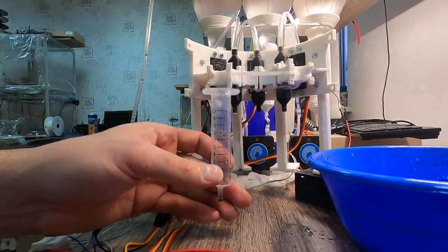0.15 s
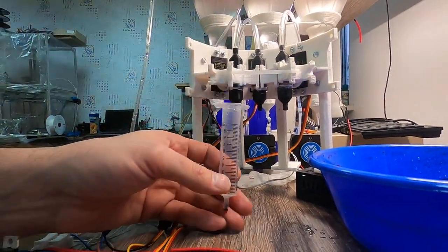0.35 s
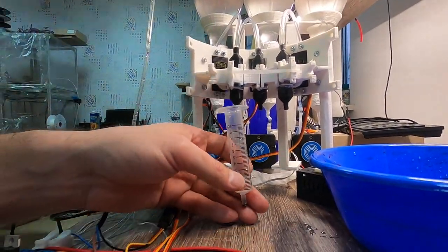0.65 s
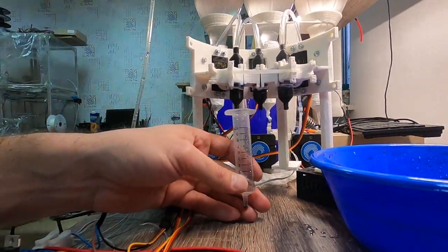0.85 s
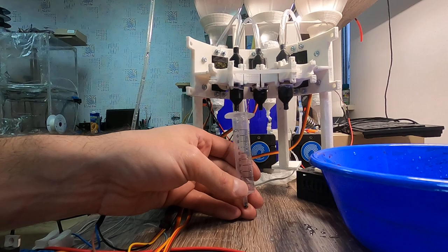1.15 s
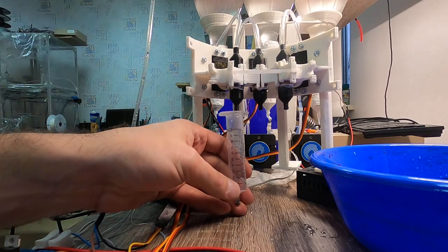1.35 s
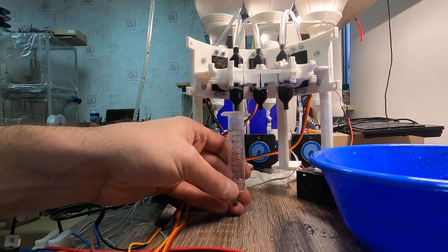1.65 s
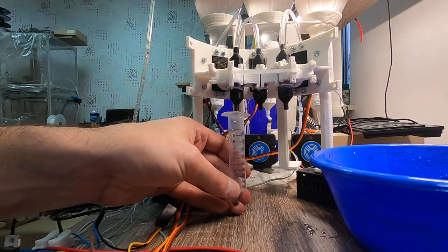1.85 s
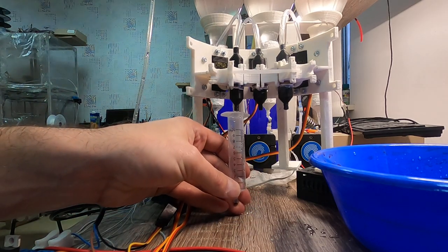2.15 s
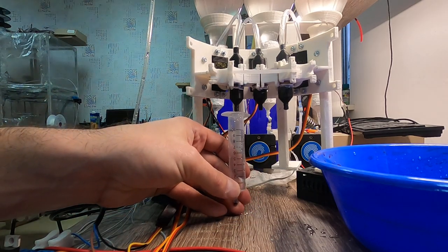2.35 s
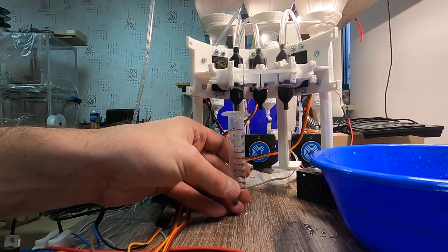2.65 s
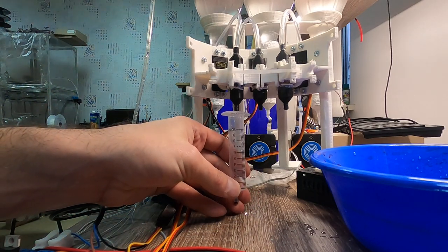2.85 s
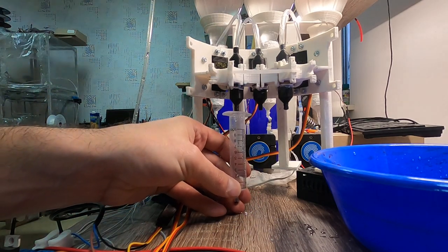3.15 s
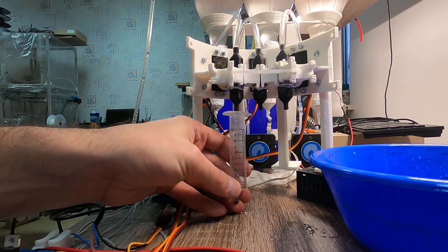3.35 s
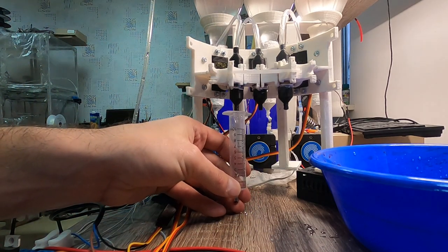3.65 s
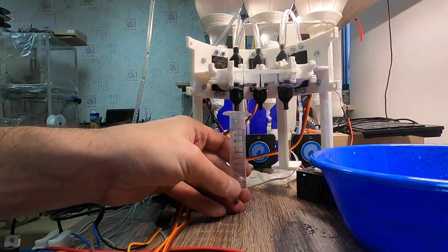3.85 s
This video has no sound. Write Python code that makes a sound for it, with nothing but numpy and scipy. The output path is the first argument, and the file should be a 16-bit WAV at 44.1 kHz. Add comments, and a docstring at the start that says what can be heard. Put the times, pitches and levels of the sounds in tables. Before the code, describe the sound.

Quiet indoor hum comes first, with barely audible taps of plastic in a hand. A button snaps down and up, and a small pump motor growls, climbs quickly in pitch and holds a wavering whirr, miked nearby.

```python
"""A stepper-driven roller pump jolts, ramps up and runs steadily in a quiet room after a button is pressed.
Its motor steps and unevenly loaded rollers excite decaying frame modes; sines and narrow noise make its whine.
The button, plastic taps and tubing ticks are short noise bursts that ring a few resonances.
Shaped noise and faint steady tones form the room hum; airy treble lingers after the press."""
import sys
import numpy as np
from scipy import signal
from scipy.fft import rfft, irfft, next_fast_len
from scipy.io import wavfile
from scipy.ndimage import uniform_filter1d

SR = 44100
rng = np.random.default_rng(int(sys.argv[2]) if len(sys.argv) > 2 else 0)


def volts(x):
    """Linear amplitude factor 10**(x/20) for a level x in dB, scalar or array-like."""
    e = np.asarray(x, float) / 20
    return 10 ** e


def wav_out(sig):
    """Save sig, one row per channel (or a flat mono array), as 16-bit PCM at SR to the path in sys.argv[1]."""
    wavfile.write(sys.argv[1], SR, np.round(np.clip(np.atleast_2d(sig).T, -1, 1) * 32767).astype(np.int16))


N = 176400

# Effort of the motor steps, strong at low speed and weaker as the rotor spins up.
# Each row: time in seconds, kick in dB, sharp edge in dB relative to the kick.
KICK_EFFORT = [(2.2, -26, 0), (2.23, -22, -13), (2.245, -19, -8), (2.26, -19, -3), (2.28, -25, -8),
               (2.3, -24, -6.5), (2.315, -22.5, -6), (2.33, -23.5, -14), (2.35, -23, -3.5),
               (2.365, -27.5, -6.5), (2.371, -30, -1), (2.393, -31, -6), (2.402, -24.5, -3),
               (2.433, -30.5, -8.5), (2.44, -36, -2), (2.47, -33.5, -2.5), (2.485, -31, -3.5),
               (2.505, -37, -3.5), (2.513, -33, -5.5), (2.545, -35.5, -0.5), (2.565, -33.5, -7.5),
               (2.585, -30.5, -9), (2.62, -63, -6.5), (4, -61, -6.5)]
# Pull of the four unequal coils. Each entry: change of the kick in dB.
COIL_PULL = [-0.5, -1, 0.5, -1.5]
# The coils take hold of the rotor, then pull it loose.
# Each row: start in seconds, push in dB, sharp edge in dB.
ROTOR_JOLTS = [(2.1205, -16, -32.5), (2.209, -30.5, -29.5)]
# Modes of the plastic frame. Each row: frequency in Hz, T60 in seconds, response to steps in dB,
# response to roller load in dB.
FRAME_MODES = [(36, 0.25, -36.5, -13), (64.9, 0.82, -32.5, -11.5), (155.1, 0.21, -3, -5),
               (180.2, 0.75, -12.5, -6.5), (206.2, 0.77, -11, -13), (264.15, 0.37, 1, -9.5),
               (438, 0.064, -4.5, -42), (554.5, 0.049, 1, -15.5), (649, 0.076, -7, -17),
               (1037, 0.04, -17, -18), (598, 0.09, -9, -25.5), (1200, 0.096, -14.5, -7.5),
               (1265, 0.092, -7, -16), (1304, 0.037, -4, -14.5), (1720, 0.041, -16, -40.5),
               (1980, 0.043, -26, -38.5), (2600, 0.0077, -22.5, -35.5), (2720, 0.058, -23, -43.5),
               (3427, 0.0078, -13.5, -19), (3460, 0.075, -25, -46), (3660, 0.046, -25, -40.5),
               (5270, 0.0033, -11.5, -31.5), (6400, 0.014, -30.5, -37)]
# Low shudder of the frame, surging at low speed and then dying abruptly.
# Each row: time in seconds, gain of the lowest modes in dB, gain of the main mode in dB.
SHUDDER_GAIN = [(2.12, -6, -6.5), (2.15, -3.5, -4), (2.185, 1.5, 3), (2.2, -6.5, -10.5), (2.22, 0, -3),
                (2.24, -1, 0.5), (2.26, -0.5, -5), (2.28, -6.5, -4), (2.292, -3, 2.5), (2.308, -5, 2.5),
                (2.32, -7.5, -2), (2.345, -9.5, 2), (2.362, -3.5, 1.5), (2.372, -17.5, -20),
                (2.42, -8.5, -6.5), (2.5, 0.5, 1)]
# Load on the rollers. Each row: time in seconds, whine in dB (used about its mean),
# rumble in dB (before a common trim), gain of the pump head in dB.
ROLLER_LOAD = [(2.6, -38, -37.5, 1), (2.724, -36.5, -38, -3), (2.822, -41.5, -37.5, -2),
               (2.946, -35, -36.5, -0.5), (3.024, -42.5, -35.5, -1.5), (3.086, -37, -38, 0.5),
               (3.181, -40, -36.5, -0.5), (3.262, -36, -36, 0), (3.29, -41, -35.5, 1.5),
               (3.405, -31.5, -34.5, 3), (3.534, -39, -36.5, -8.5), (3.594, -35.5, -33, 4.5),
               (3.656, -35, -39, -4), (3.694, -40, -32.5, 2), (3.766, -31.5, -38, -1.5),
               (3.878, -38, -34, -4), (3.94, -34.5, -34.5, 6), (4.0, -34.5, -43.5, -4.5)]
# Whine of the coils. Each row: multiple of the coil cycle, mean level in dB rms at full speed.
COIL_WHINE = [(1, -43.5), (2, -66), (4, -34.5), (7, -76), (8, -65), (10, -66), (12, -59.5), (14, -73.5),
              (17, -78.5)]
# Lines above the step tone, made by the throbbing rollers.
# Each row: offset in roller passes, mean level in dB rms before the load gain.
ROLLER_SIDEBANDS = [(1, -46.5), (2, -55), (3, -49.5), (4, -49), (5, -56.5)]
# Narrow modes of the pump head. Each row: frequency in Hz, T60 in seconds, dB rms before the load gain.
HEAD_MODES = [(1172, .2, -52), (1201, .25, -45), (1238, .15, -55), (1300, .15, -52), (1314, .2, -46),
              (1330, .2, -53)]
# Press, bounce and release of the button. Each row: start in seconds, drive of the snap in dB,
# drive of the body in dB, drive of the rattle in dB.
BUTTON_CLICKS = [(2.0299, -23, -26, -39), (2.0431, -46.5, -51, -57), (2.163, -37, -25.5, -39)]
# Modes of the button case. Each row: frequency in Hz, response in dB, T60 in seconds.
CASE_MODES = [(315, 4.5, 0.033), (572, 0, 0.041), (782, -1, 0.038), (1897, -9.5, 0.032),
              (2520, -10.5, 0.036), (4250, -22, 0.016), (5140, -30.5, 0.073), (7000, -24, 0.0114),
              (8700, -3, 0.012), (9500, -15, 0.02), (15200, -11, 0.008)]
# Ticks of tubing and plastic. Each row: start in seconds, drive in dB (before a common trim), pitch in Hz,
# upper ring in dB, top ring in dB (before a common lift), both relative to the drive.
PLASTIC_TICKS = [(1.7094, -66, 3060, -16, -18), (2.095, -44.5, 3340, -14, -6),
                 (2.5459, -38, 3300, -32.5, -36), (2.6627, -33, 3350, -37.5, -36),
                 (2.6873, -40.5, 3440, -34, -40), (2.7202, -36.5, 3370, -28, -35),
                 (2.891, -43, 3460, -28.5, -37), (3.0113, -30.5, 3550, -11.5, -18.5),
                 (3.0704, -32, 3480, -20, -33), (3.0878, -37.5, 3430, -22, -40),
                 (3.1213, -41.5, 3460, -10.5, -24), (3.2613, -36, 3400, -15.5, -30.5),
                 (3.4136, -39.5, 3160, -21, -27.5), (3.4348, -35, 3180, -16.5, -41),
                 (3.532, -44.5, 3460, -5.5, -38), (3.584, -37.5, 3490, -14, -29),
                 (3.675, -44, 3450, -5.5, -24), (3.7059, -27.5, 3460, -16, -55),
                 (3.7658, -32, 3350, -31, -47), (3.9346, -42.5, 3440, -2, -35),
                 (3.9395, -26, 3470, -20, -49), (3.9914, -39, 3570, -14, -24)]
# Light taps of plastic in the hand. Each row: start in seconds, snap drive in dB,
# body drive in dB (before a common trim).
HAND_TAPS = [(0.2983, -28.5, -61), (0.3712, -40.5, -62)]
# Airy treble around the start. Each row: time in seconds, level in dB rms.
AIR_LEVEL = [(2.04, -68), (2.2, -67.5), (2.3, -70), (2.5, -75.5), (2.6, -84.5)]
# Faint steady tones of the room. Each row: frequency in Hz, mean level in dB rms.
ROOM_TONES = [(673, -61), (840, -65), (1300, -68.5)]
# Spectrum of the room hum. Each row: frequency in Hz, relative density in dB per Hz.
ROOM_SPECTRUM = [(12, -28), (20, -4.5), (69, -3.5), (91, -4), (124, -3.5), (146, -7), (188, 2), (211, -3.5),
                 (229, -14.5), (264, -3), (303, -7.5), (390, -2.5), (425, -7), (562, -7.5), (647, -11.5),
                 (723, -16), (856, -20), (1100, -17.5), (1300, -16), (2100, -29.5), (3110, -25),
                 (6090, -40), (8530, -42.5), (14900, -53), (16200, -59.5)]
# Difference of the room at the two ports. Each row: frequency in Hz, side minus mid in dB.
ROOM_WIDTH = [(60, -35.5), (110, -69), (200, -72.5), (380, -44.5), (700, -36.5), (1290, -32.5),
              (2380, -32.5), (4400, -29), (8120, -17.5), (15000, 4.5)]
# Slow level of the room hum. Each row: time in seconds, gain in dB.
ROOM_GAIN = [(0, 2.1), (.3, 0.51), (.5, 0.027), (2, 0.3), (4, 0.12)]
# Level difference of the pump at the two ports. Each row: frequency in Hz, left minus right in dB.
PORT_BALANCE = [(30, 3), (60, 2), (110, 1), (200, .1), (700, .3), (1000, -2), (1152, -3), (1350, -2.5),
                (2380, 1.5), (4400, 2), (8120, 1.5)]
# Phase difference of the pump at the two ports. Each row: frequency in Hz, lead of the left in radians.
PORT_PHASE = [(25, 0.65), (60, -0.87), (150, -0.063), (600, -0.34), (1000, -0.24), (1152, -1),
              (1460, -0.25), (7000, -0.94), (9000, -.1)]

# the step rate ramps evenly from rest to full speed
START_S, RAMP_HZ_PER_S, FULL_HZ = 2.208, 3030, 1152.3
FULL_S = START_S + FULL_HZ / RAMP_HZ_PER_S
STEPS_PER_TURN, ROLLERS, COILS = 200, 6, 4
WHINE_RISE_S = .04
EDGE_S = .0001  # length of the sharp edge of a kick or jolt
LOWEST_HZ, SHUDDER_HZ = 230, 300  # upper limits of the lowest modes and of the shudder


def along(table, x, axis=1):
    """Linear interpolation reads a column of a table at x."""
    a = np.array(table, float)
    return np.interp(x, a[:, 0], a[:, axis])


def by_hz(table):
    """Interpolation on a logarithmic frequency axis reads a (Hz, value) table at every FFT bin."""
    a = np.array(table, float)
    return np.interp(np.log(np.fft.rfftfreq(N, 1 / SR) + 1), np.log(a[:, 0]), a[:, 1])


def butter(x, order, hz, kind):
    """A Butterworth filter has a maximally flat passband."""
    return signal.sosfilt(signal.butter(order, hz, kind, fs=SR, output="sos"), x)


def ring(x, hz, t60):
    """A two-pole resonator is one decaying mode; a unit impulse rings with peak near 1."""
    r = np.exp(-np.log(1000) / (max(t60, .001) * SR))
    w = 2 * np.pi * hz / SR
    return signal.lfilter([0, r * np.sin(w)], [1, -2 * r * np.cos(w), r * r], x)


def push(x, seconds):
    """A one-pole lowpass rounds impulses into pushes with the given time constant."""
    soft = np.exp(-1 / (seconds * SR))
    return signal.lfilter([1 - soft], [1, -soft], x)


def unit(x):
    """Division by the rms scales a signal to rms 1."""
    return x / np.sqrt(np.mean(x ** 2))


def walk(rate):
    """Random values, held and smoothed twice, give a slow fluctuation of rms 1."""
    k = int(SR / rate)
    held = np.repeat(rng.standard_normal(size=999), k)[:N]
    return unit(uniform_filter1d(uniform_filter1d(held, k), k))


def clicks(times, sizes):
    """Impulses shared between neighbouring samples fall at fractional times."""
    out, at = np.zeros(N + 2), np.clip(np.asarray(times) * SR, 0, N)
    i = at.astype(int)
    np.add.at(out, i, sizes * (1 - at + i))
    np.add.at(out, i + 1, sizes * (at - i))
    return out[:N]


def burst(t, s, decay):
    """Noise under a square-root rise and exponential decay models a brief impact."""
    age = np.clip(t - s, 0, None) / decay
    return rng.standard_normal(N) * np.sqrt(age) * np.exp(-age) * 2


def room(t):
    """Spectrally shaped noise is the room hum; a weak side signal makes the two ports differ."""
    level_db, wander_db = -46, .5
    shape = volts(by_hz(ROOM_SPECTRUM))
    mid = irfft(rfft(rng.standard_normal(N)) * shape, N)
    side = irfft(rfft(rng.standard_normal(N)) * shape * volts(by_hz(ROOM_WIDTH)), N)
    gain = volts(level_db + along(ROOM_GAIN, t) + wander_db * walk(rate=1.5)) / np.sqrt(np.mean(mid ** 2))
    return gain * np.array([mid + side, mid - side])


def room_tones(t):
    """Sines of constant frequency and slowly wavering level form the faint tones of the room."""
    out = 0
    for hz, db in ROOM_TONES:
        out = out + np.sqrt(2) * volts(db + 2 * walk(20)) * np.sin(2 * np.pi * (hz * t + rng.random()))
    return out


def air(t):
    """Independent highpassed noise at each port gives a diffuse treble that lingers after the press."""
    hiss = butter(rng.standard_normal((2, N)), 2, 11500, "high")
    return unit(hiss) * volts(along(AIR_LEVEL, t)) * (t > AIR_LEVEL[0][0]) * (t < AIR_LEVEL[-1][0])


def taps(t):
    """A brief impact radiates a crisp broadband snap and excites a short hollow resonance."""
    out = 0
    for s, db, body_db in HAND_TAPS:
        snap = burst(t, s, .0009)
        out = out + volts(db) * butter(push(snap, .0001), 3, [1400, 8500], "band")
        out = out + volts(body_db - 15) * ring(snap, 1880, 0.014)
    return out


def ticks(t):
    """Short impacts ring three resonances; random weak impulses add a faint crackle once the pump runs."""
    out = 0
    for s, db, hz, mid_db, top_db in PLASTIC_TICKS:
        hit = volts(db - 16) * burst(t, s, .0014)
        out = out + ring(hit, hz, 0.0037)
        out = out + volts(mid_db) * ring(hit, 5780, 0.0096)
        out = out + volts(top_db + 4) * ring(hit, 8800, 0.0089)
        out = out + volts(mid_db - 5) * butter(hit, 2, [1500, 6500], "band")
    crackle_per_s, crackle_db, spread_db = 280, -69.5, 4
    sizes = volts(crackle_db + spread_db * np.minimum(rng.exponential(size=N), 3))
    fine = (rng.random(N) < crackle_per_s / SR) * sizes * (t > 2.55)
    out = out + ring(fine, 2700, 0.011) + ring(fine, 5400, 0.0023)
    return butter(out, 3, 8200, "low")


def button(t):
    """Contact makes a bright snap and a short rattle, and an impulse excites the modes of the case."""
    out = 0
    for s, db, body_db, rattle_db in BUTTON_CLICKS:
        snap = burst(t, s, 0.0011)
        out = out + volts(db) * butter(snap, 1, [3500, 10000], "band")
        out = out + volts(db - 12) * ring(snap, 7540, 0.0024)
        rattle = burst(t, s + 0.00076, 0.0076)
        out = out + volts(rattle_db) * butter(rattle, 2, [1500, 6000], "band")
        hit = clicks([s + 0.000997], volts(body_db))
        for k, (hz, gain_db, t60) in enumerate(CASE_MODES):
            out = out + (-1) ** k * volts(gain_db) * ring(hit, hz, t60)
    return out


def unsteadiness(t):
    """The rotor's irregularity grows linearly from none to full in the upper part of the ramp."""
    return np.clip((t - 2.31) / .1, 0, 1)


def motor_steps(t):
    """The integral of the step rate is the step count; the rotor hunts about its speed on the ramp."""
    wobble_share = .012
    rate = np.clip((t - START_S) * RAMP_HZ_PER_S, 0, FULL_HZ)
    hunt = unsteadiness(t) * (rate < FULL_HZ)
    return np.cumsum(rate * (1 + wobble_share * hunt * walk(rate=50))) / SR


def step_kicks(t, steps):
    """Each whole step applies an impulse, a rounded push plus a sharp edge, of uneven force."""
    scatter_share, jitter_s, stutter_db = .07, .00003, 3.5
    count = np.arange(int(steps[-1]))
    at = np.interp(count, steps[t >= START_S], t[t >= START_S])
    stutter = stutter_db * unsteadiness(at) * np.interp(at, t, walk(rate=60))
    force = volts(along(KICK_EFFORT, at) + np.array(COIL_PULL)[count % COILS] + stutter)
    force = force * (1 + scatter_share * rng.standard_normal(len(at)))
    at = at + jitter_s * rng.standard_normal(len(at))
    edge = force * volts(along(KICK_EFFORT, at, axis=2))
    return push(clicks(at, force), .0013) + push(clicks(at, edge), EDGE_S)


def rotor_jolts():
    """A sudden magnetic pull on the rotor is an impulse with a rounded push and a sharp edge."""
    when, push_db, edge_db = np.array(ROTOR_JOLTS).T
    return push(clicks(when, volts(push_db)), .0011) + push(clicks(when, volts(edge_db)), EDGE_S)


def roller_shake(t, turn):
    """Uneven rollers load the shaft with noise that partly repeats at each turn and each roller pass."""
    turn_share, roller_share, throb_db, trim_db, rise_s = 0.74, 0.35, 2.5, -4.5, .065

    def again(phase, size):
        """Periodicity: one stretch of noise is read anew in every cycle."""
        return rng.standard_normal(size)[(phase % 1 * size).astype(int)]

    shake = rng.standard_normal(N) + turn_share * again(turn, size=7650)
    shake = shake + roller_share * again(turn * ROLLERS, size=1275)
    throb = throb_db * np.cos(2 * np.pi * turn * ROLLERS)
    level = volts(throb + along(ROLLER_LOAD, t, axis=2) + trim_db)
    return shake * level * np.clip(1 + (t - FULL_S) / rise_s, 0, 1)


def loose_parts(kicks, shudder):
    """Beyond a small gap, the shudder displacement makes loose parts chatter: a one-sided nonlinearity."""
    gap, gain_db = 0.018, -20
    sway = ring(kicks, 262.6, 0.29) * shudder
    noise = butter(rng.standard_normal(N), 2, 1800, "low")
    chatter = noise * 3 * volts(gain_db) * np.clip(sway - gap, 0, None)
    return chatter - push(chatter, 0.0008)  # without the low part


def frame(t, steps):
    """Modal superposition: step kicks and roller load excite the decaying modes of the plastic frame."""
    kick_ring_share = 0.47  # hard kicks die faster in the upper modes than the light rumble
    kicks = step_kicks(t, steps) + rotor_jolts()
    lowest, shudder = volts(along(SHUDDER_GAIN, t)), volts(along(SHUDDER_GAIN, t, axis=2))
    shake = roller_shake(t, steps / STEPS_PER_TURN) + loose_parts(kicks, shudder)
    out = 0
    for k, (hz, t60, step_db, load_db) in enumerate(FRAME_MODES):
        kick_t60 = t60 if hz < SHUDDER_HZ else kick_ring_share * t60
        gain = lowest if hz < LOWEST_HZ else shudder if hz < SHUDDER_HZ else 1
        struck = volts(step_db) * ring(kicks, hz, kick_t60) * gain
        # a long mode gathers more noise power, hence the division
        shaken = volts(load_db) * ring(shake, hz, t60) / np.sqrt(t60 * SR / 23.8)
        out = out + (-1) ** k * (struck + shaken)
    return out


def coil_whine(t, steps):
    """Magnetic force periodic in the coil cycle radiates its harmonics; load sways the step tone."""
    swing = along(ROLLER_LOAD, t) - np.mean(np.array(ROLLER_LOAD)[:, 1])
    out = 0
    for k, db in COIL_WHINE:
        step_tone = k == COILS
        level_db = db + (1.2 if step_tone else 1.5) * walk(24.7) + swing * step_tone
        # the step tone rises just before full speed, the others just after
        rise = np.clip(step_tone + (t - FULL_S) / WHINE_RISE_S, 0, 1)
        tone = np.sin(2 * np.pi * (k * steps / COILS + rng.random()))
        out = out + np.sqrt(2) * volts(level_db) * tone * rise
    return out


def pump_head(t, steps):
    """Modulation by the rollers puts sidebands above the step tone; noise excites narrow head modes."""
    sideband_waver_db, throb_db = 3, 1.5
    passes = steps / STEPS_PER_TURN * ROLLERS
    out = 0
    for k, db in ROLLER_SIDEBANDS:
        tone = np.sin(2 * np.pi * (steps + k * passes + rng.random()))
        out = out + np.sqrt(2) * volts(db + sideband_waver_db * walk(rate=7.8)) * tone
    for hz, t60, db in HEAD_MODES:
        out = out + volts(db) * unit(ring(ring(rng.standard_normal(N), hz, t60), hz, t60))
    out = out * volts(along(ROLLER_LOAD, t, axis=3) + throb_db * np.cos(2 * np.pi * passes))
    return out * np.clip(1 + (t - FULL_S) / WHINE_RISE_S, 0, 1)


def pump(t):
    """One rotor motion drives both the frame and the tones of coils and head, so they stay in step."""
    steps = motor_steps(t)
    return frame(t, steps), coil_whine(t, steps) + pump_head(t, steps)


def two_ports(bench):
    """Level and phase differences, split evenly between the ports, place the bench to one side."""
    half = volts(by_hz(PORT_BALANCE) / 2) * np.exp(.5j * by_hz(PORT_PHASE))
    return np.array([irfft(rfft(bench) * half, N), irfft(rfft(bench) / half, N)])


def echo(t, source):
    """Convolution with exponentially decaying noise gives a short dull reverberation."""
    t60_s, wide, gain_db = 0.34, .3, -10
    mid, side = rng.standard_normal((2, N)) * (t > .004) * np.exp(-np.log(1000) * t / t60_s)
    side = wide * (side - push(side, .0002))  # only the treble differs between the ports
    tail = np.array([mid + side, mid - side]) / np.sqrt(np.sum(mid ** 2))
    tail = butter(tail, 1, [450, 4000], "band")
    size = next_fast_len(2 * N)
    return volts(gain_db) * irfft(rfft(source, size) * rfft(tail, size), size)[:, :N]


def scene():
    """Superposition: bench sounds at one side, the button near the middle, their echo, and the room."""
    t = np.arange(N) / SR
    press_lag_s, press_echo_db = .000012, -4
    vibration, tones = pump(t)
    press = button(t)
    knocks = vibration + ticks(t) + taps(t)
    near = two_ports(knocks + tones)
    near = near + np.array([press, np.interp(t - press_lag_s, t, press)])
    reflected = echo(t, knocks + volts(press_echo_db) * press)
    return near + reflected + room(t) + room_tones(t) + air(t)


def band_limit(x):
    """A steep low-pass at the top of the band."""
    return signal.sosfilt(signal.butter(12, 15700, fs=SR, output="sos"), x)


def record(dry):
    """A first-order highpass at 15 Hz is the microphone's loss of the lowest bass."""
    mix = butter(dry, 1, 15, "high")
    return band_limit(mix)


dry = scene()
out = record(dry)
wav_out(out)
```